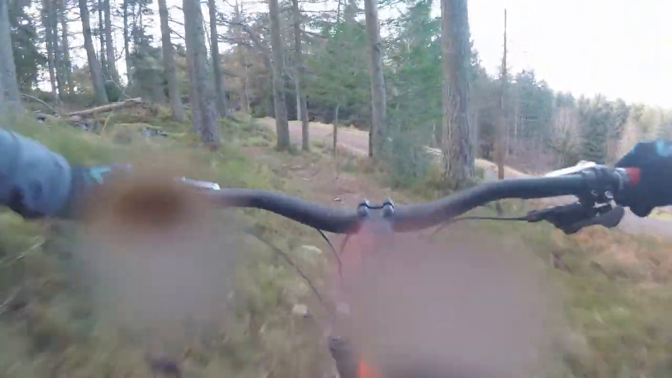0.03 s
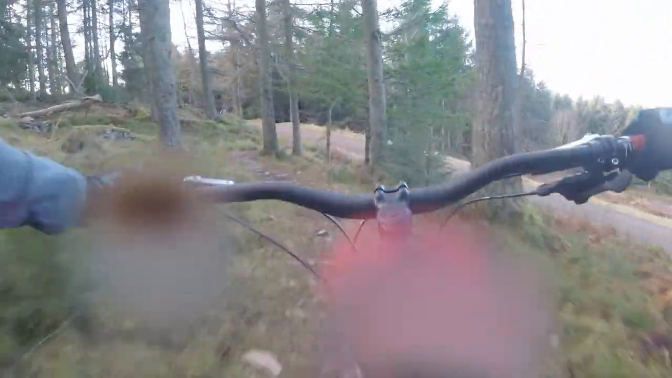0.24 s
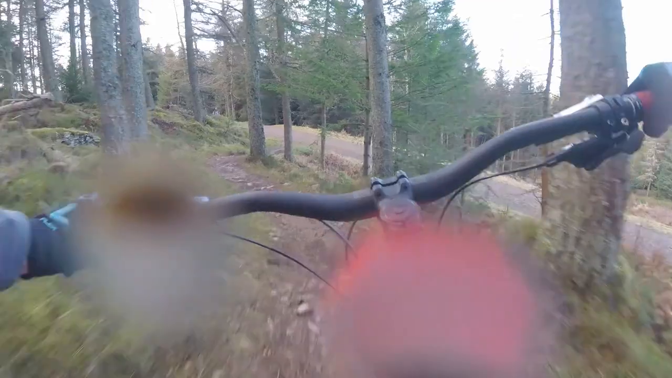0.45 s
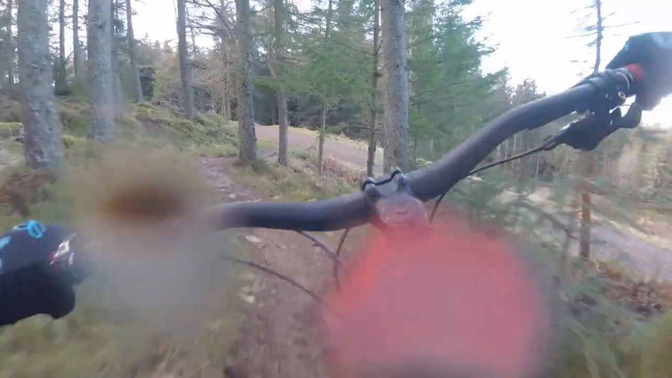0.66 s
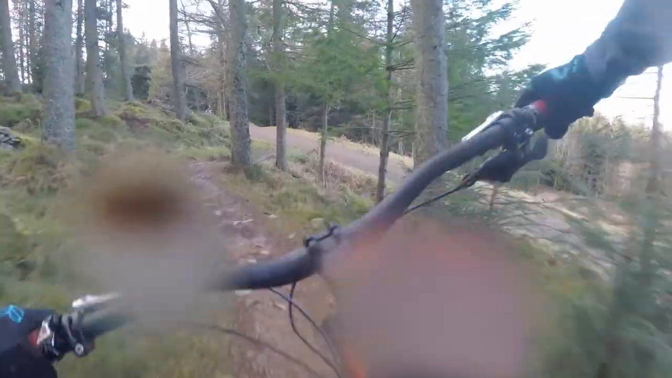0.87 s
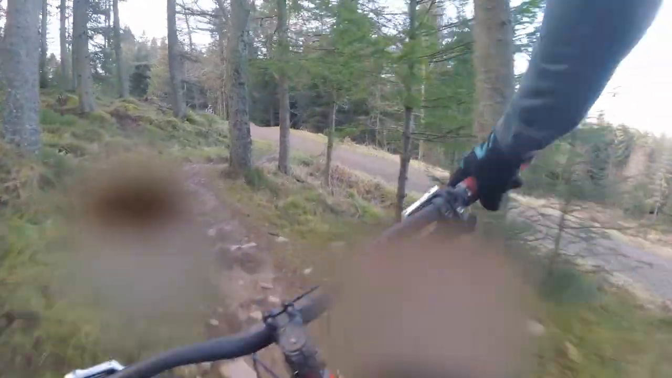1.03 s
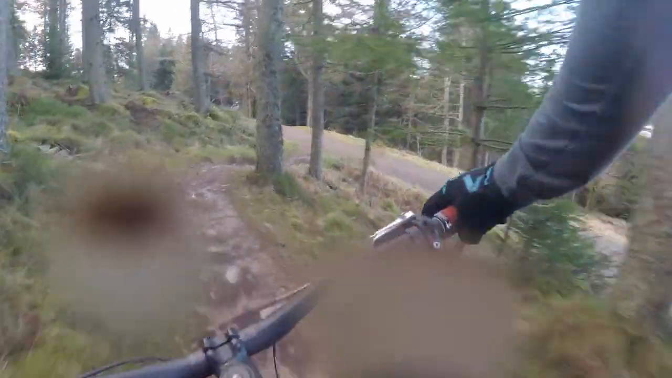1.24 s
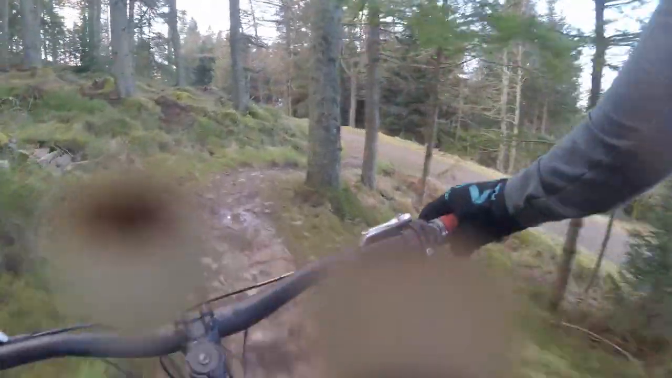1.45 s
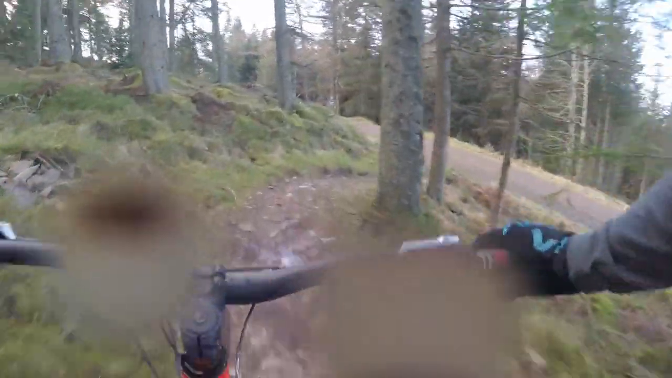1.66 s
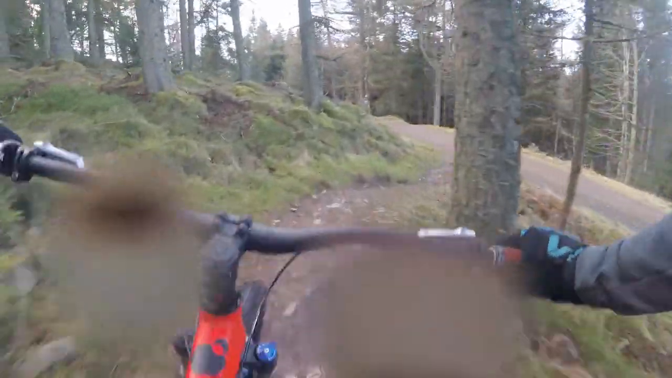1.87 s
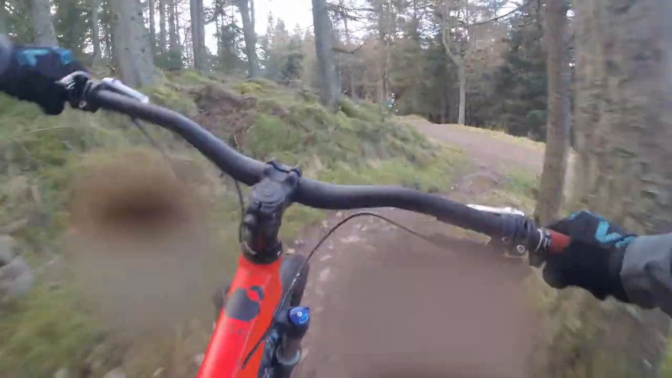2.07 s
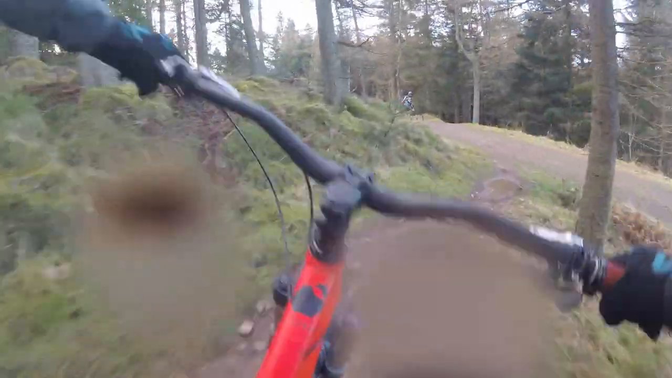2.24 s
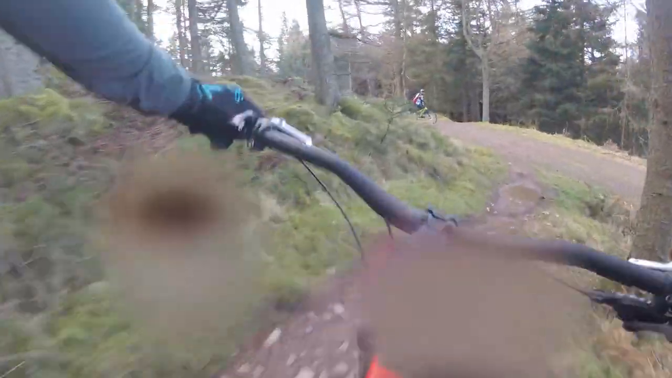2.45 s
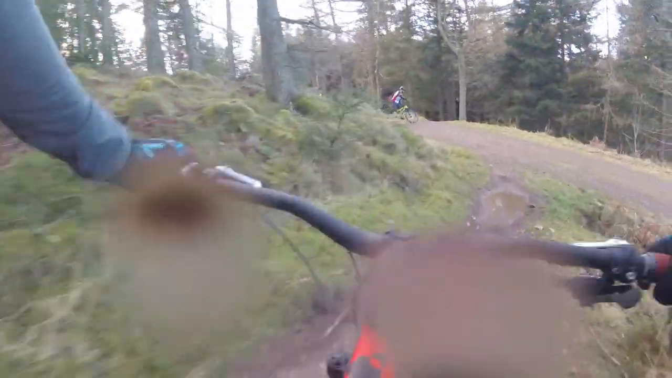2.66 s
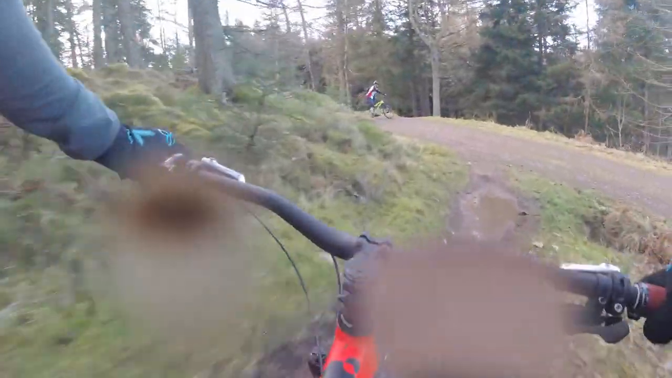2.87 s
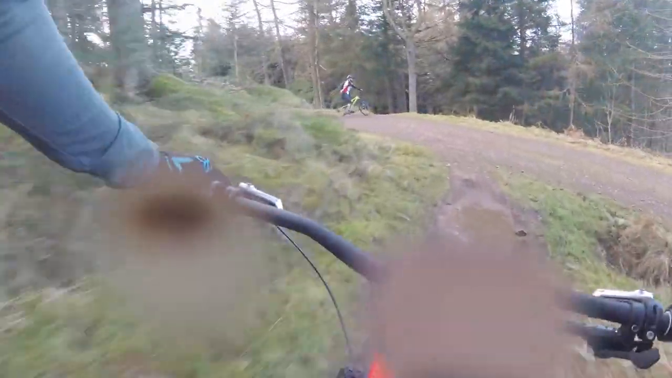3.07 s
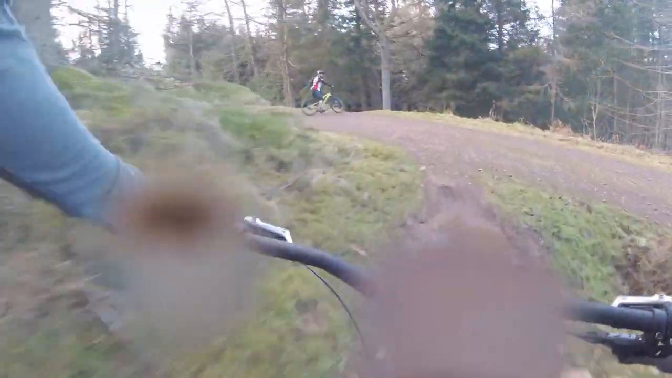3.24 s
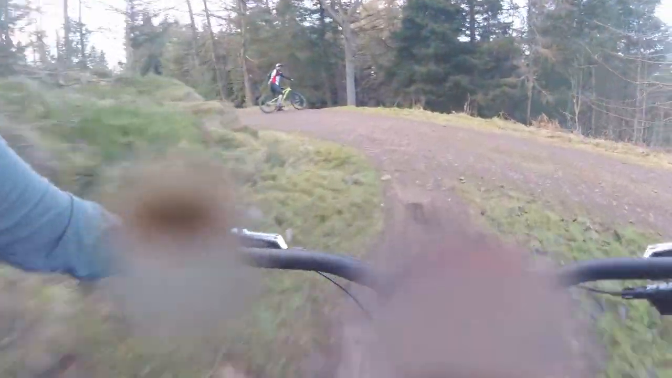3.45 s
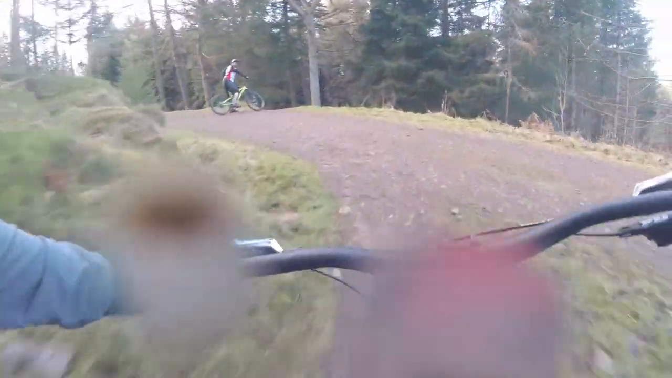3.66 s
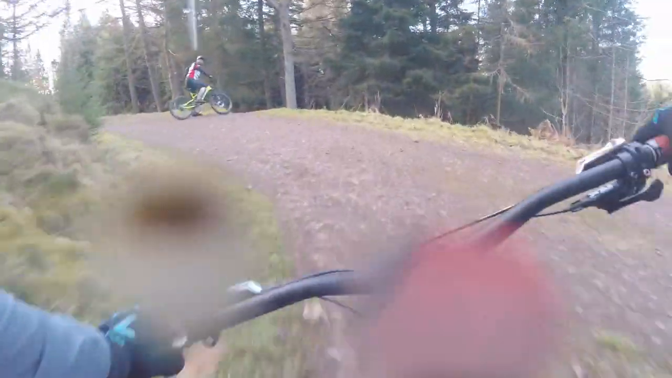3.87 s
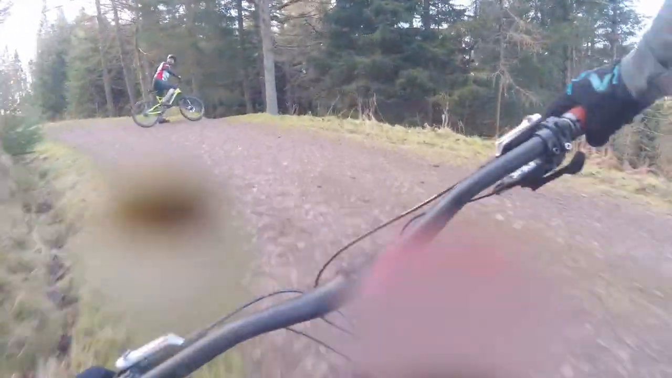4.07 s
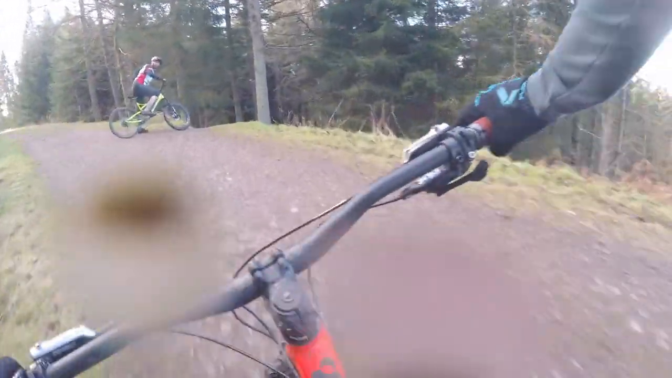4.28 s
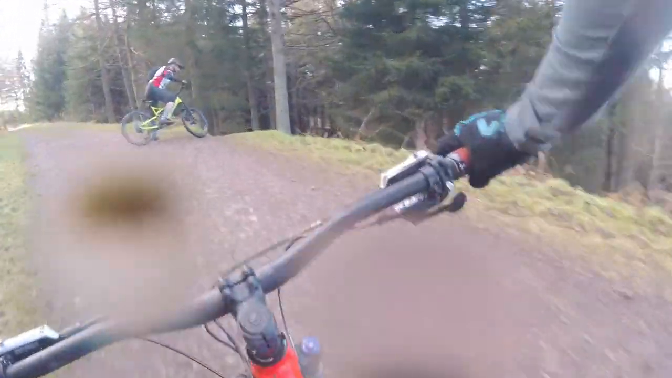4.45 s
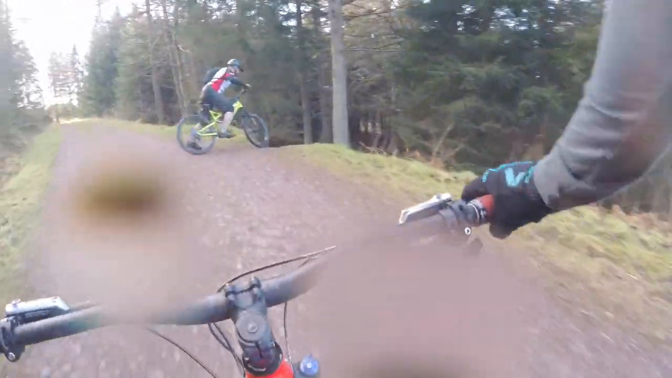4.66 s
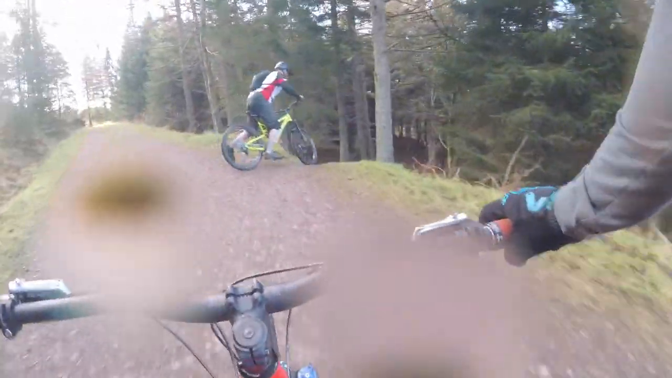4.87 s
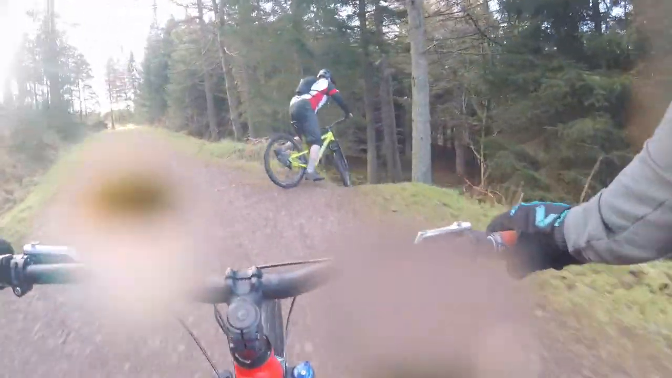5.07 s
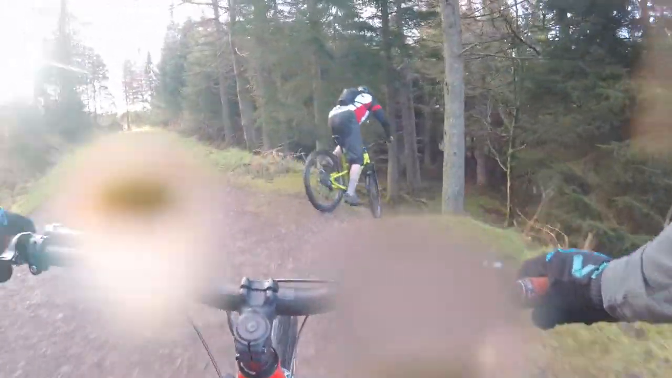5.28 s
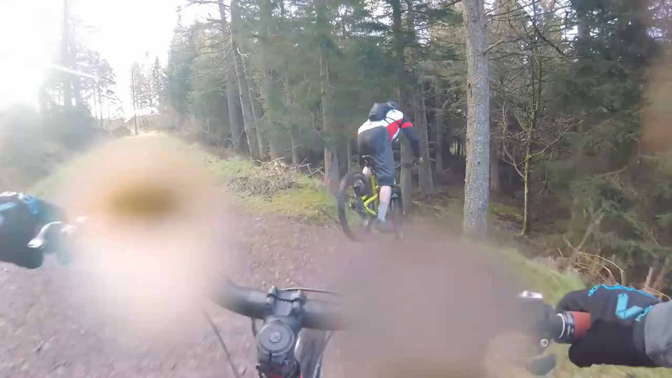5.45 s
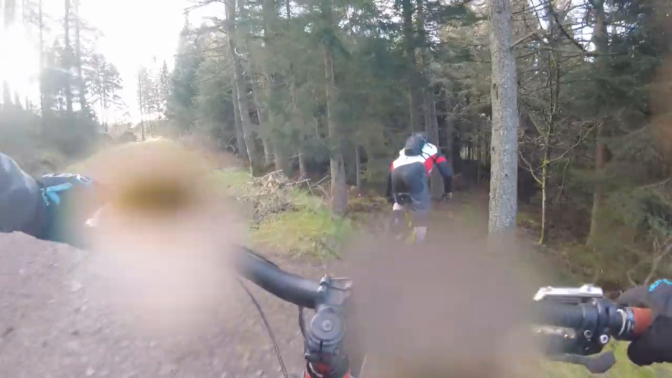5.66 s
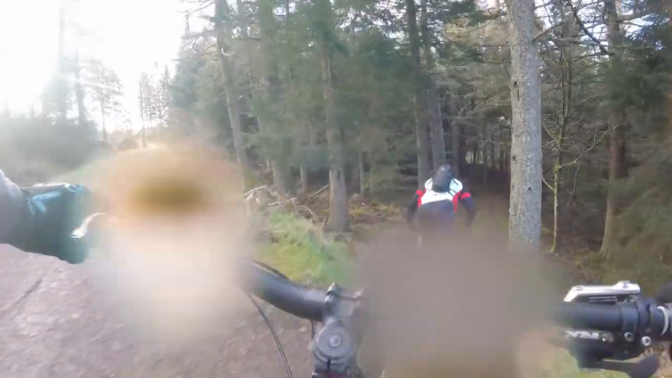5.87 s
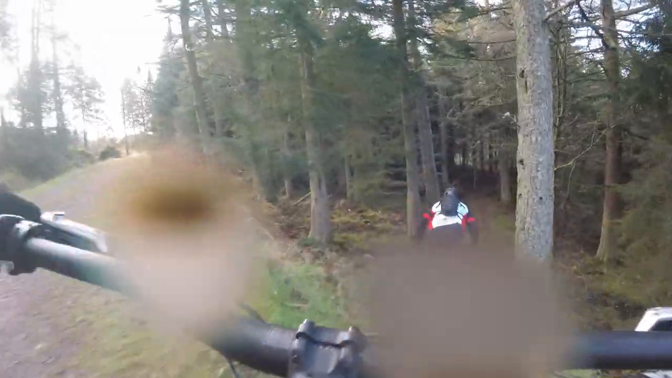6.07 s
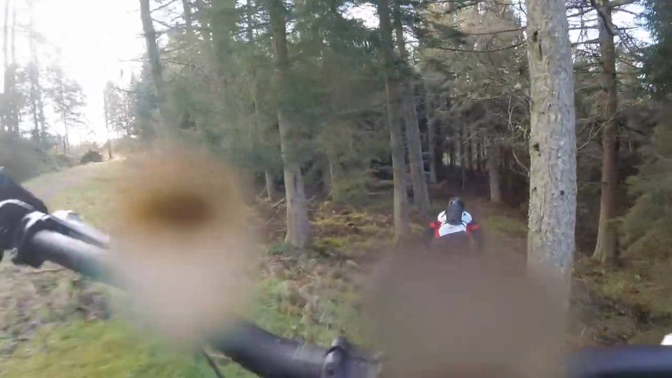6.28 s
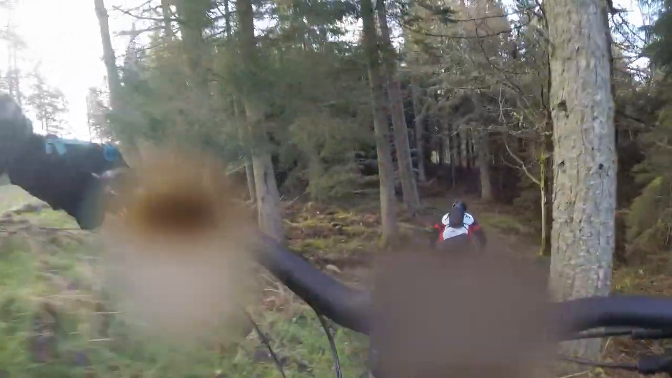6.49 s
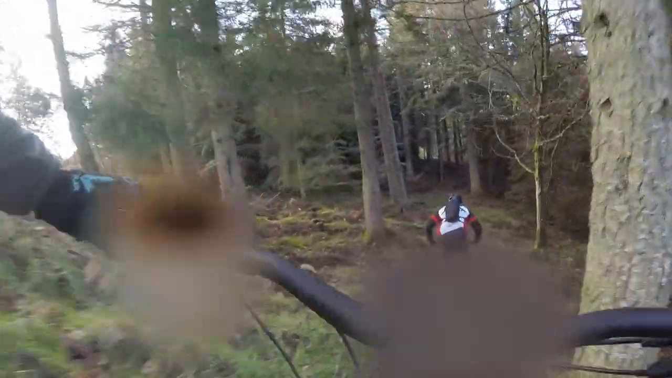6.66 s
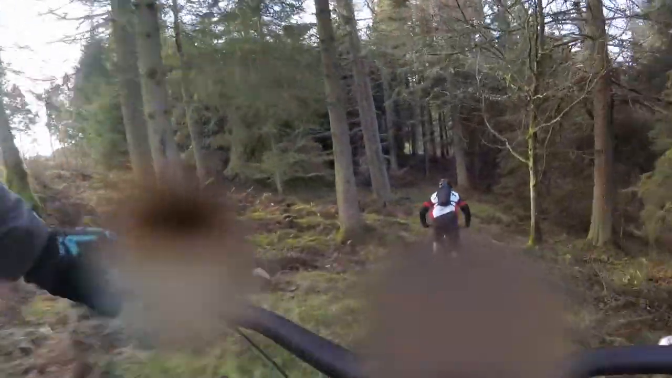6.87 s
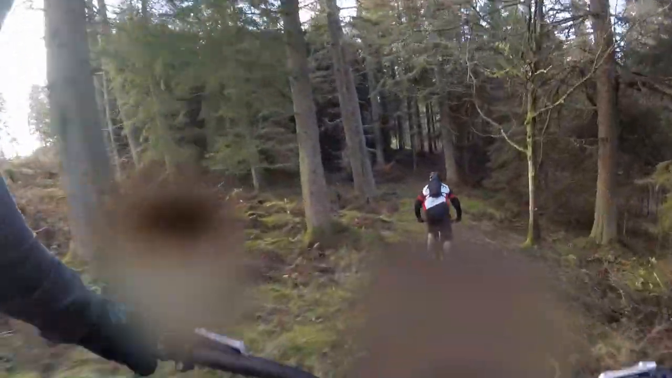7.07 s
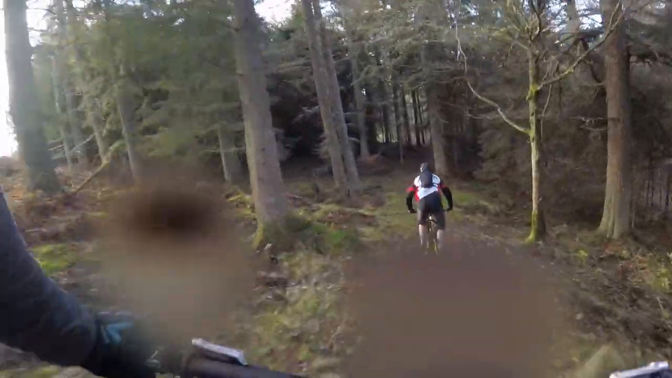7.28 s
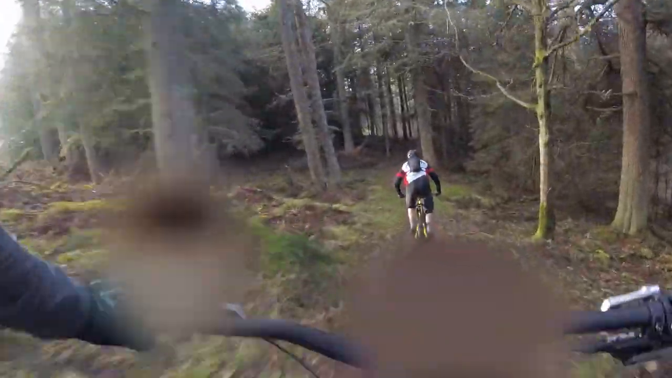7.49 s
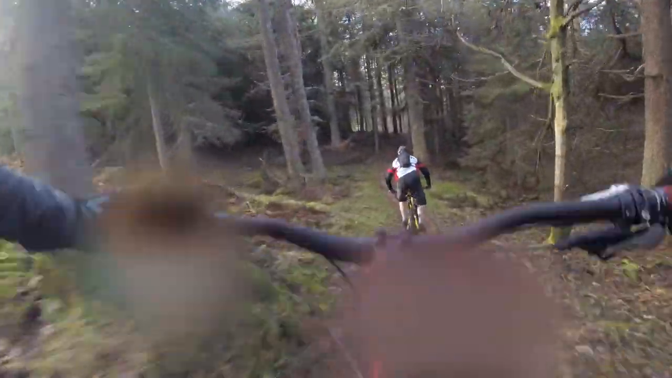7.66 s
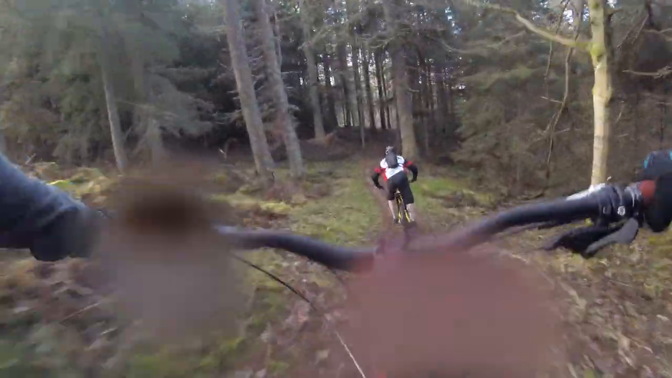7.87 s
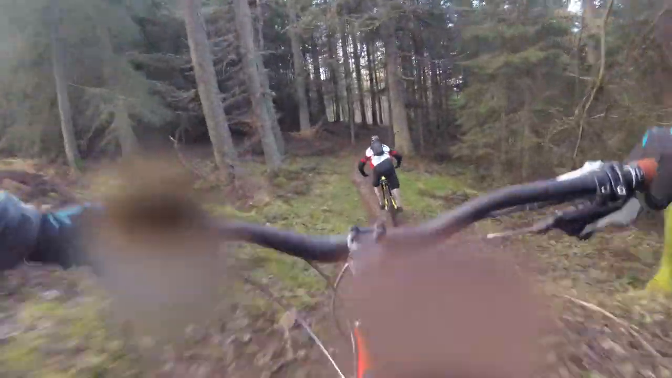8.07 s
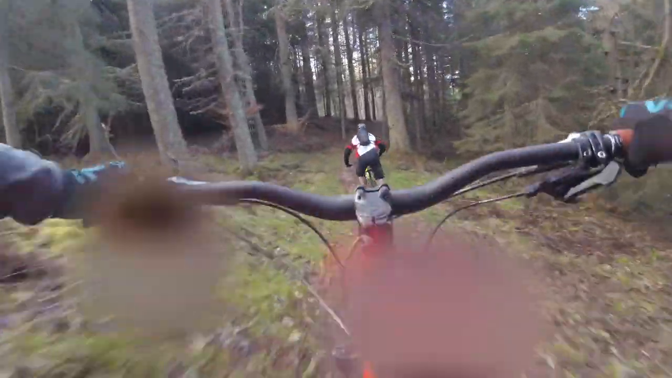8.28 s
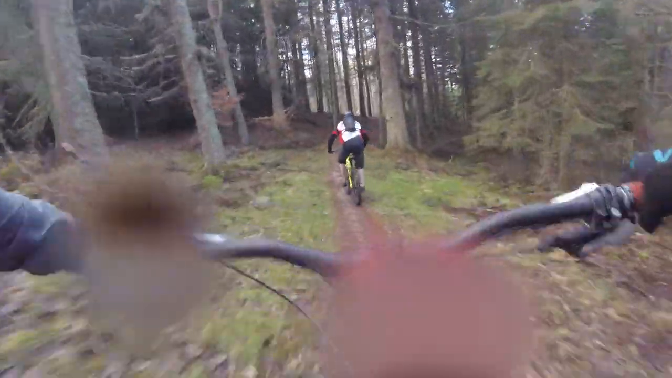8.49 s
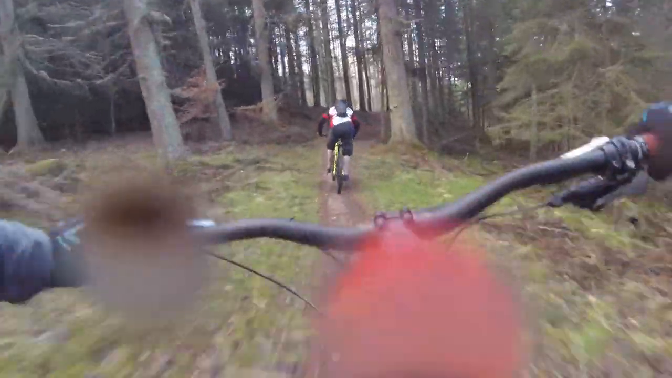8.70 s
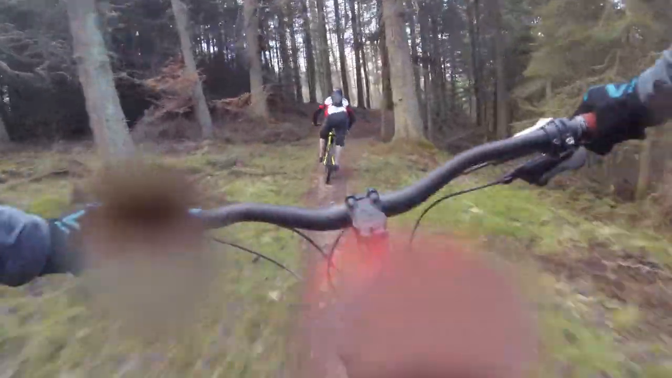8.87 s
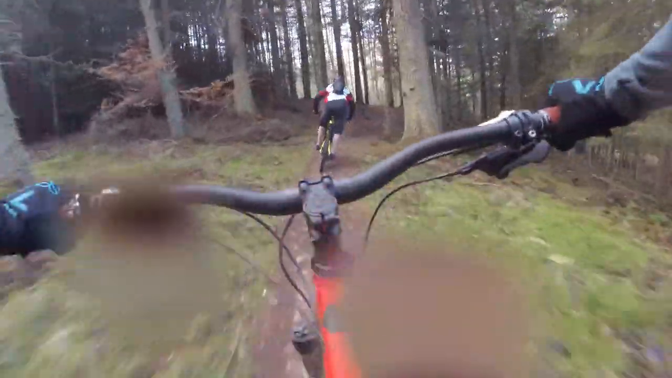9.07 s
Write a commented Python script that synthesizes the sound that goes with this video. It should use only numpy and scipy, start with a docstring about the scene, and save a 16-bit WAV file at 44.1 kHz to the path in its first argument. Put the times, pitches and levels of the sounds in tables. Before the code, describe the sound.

A mountain bike crunches down a muddy forest trail, wind rumbling on the microphone, stones clacking, a brief puddle splash, then heavy low thuds over roots.

```python
"""Wind rumbles and buffets while tyres crunch over grit, as a mountain bike rolls down a muddy trail.
It is heard from a camera on the rider's chest. The wind is noise that rises and falls in gusts.
The tyres are many tiny impacts, first on grit, then through a puddle's spray, then on needle litter.
Stones, chain and cables clack against the bike as short bursts of noise, some with a brief ring.
Roots jolt the camera mount, which thuds low while the camera case knocks."""
import sys
import numpy as np
from scipy import signal
from scipy.fft import rfft, irfft
from scipy.io import wavfile
from scipy.ndimage import uniform_filter1d

SR = 44100
rng = np.random.default_rng(int(sys.argv[2]) if len(sys.argv) > 2 else 0)


def file_out(sig):
    """Save sig as 16-bit WAV at sys.argv[1]."""
    # one column per channel
    cols = np.atleast_2d(sig).T
    # limit, then scale
    lim = np.clip(cols, -1, 1)
    pcm = np.round(lim * 32767).astype(np.int16)
    wavfile.write(sys.argv[1], SR, pcm)


N = 402621
T = np.arange(N) / SR  # time of each sample, in seconds
TOP_HZ = 15200
GRAVEL_SPREAD_DB = 3.0  # how unequal the ticks of gravel and twigs are
LITTER_FROM_S = 7.46
LITTER = np.clip((T - LITTER_FROM_S) / 0.55, 0, 1)  # share of the ground that is needle litter

# All levels in the tables are relative: each sound has its own overall level in its function.
# Tyres on the ground: (time [s], crunch [dB], hiss [dB])
ROLLING_LEVELS = [(0, -29, -41.5), (.7, -36, -46), (1.15, -27, -44.5), (1.6, -37, -43.5), (2.0, -30, -42),
                  (2.6, -37, -47), (3.3, -35, -44), (4.05, -32.5, -46.5), (4.7, -36.5, -49),
                  (5.0, -37.5, -45.5), (6.05, -42, -48), (6.7, -35, -44), (6.95, -36, -43),
                  (7.25, -33.5, -41), (7.65, -41, -46.5), (8.05, -36, -43), (8.45, -39.5, -44.5),
                  (9.13, -42, -51.5)]
# Sheets of water thrown up in the puddle: (time [s], half length [s], spray [dB], fine mist [dB])
PUDDLE_SPLASHES = [(3.404, 0.052, -32.5, -29), (3.441, 0.044, -28, -48), (3.568, 0.072, -26, -32),
                   (3.646, 0.093, -30.5, -26.5), (3.78, 0.055, -30, -36.5), (3.86, 0.17, -44.5, -55)]
# The tread flicks up wet mud: (time [s], level at the top [dB], half length [s])
MUD_FLICKS = [(1.62, -39.5, 0.03), (1.966, -36.5, 0.017), (2.266, -31, 0.011)]
# Stones and sticks kicked against the frame and rims: (time [s], peak [dB], centre of the knock [Hz])
KICKED_STONES = [(.145, -14.5, 2180), (0.346, -17, 1950), (1.028, -15.5, 1600), (1.108, -13, 1700),
                 (1.140, -20, 1500), (1.165, -22, 1400), (1.289, -20, 1300), (1.386, -11.5, 1460),
                 (1.458, -15.5, 1250), (1.75, -15, 1520), (1.8047, -11, 1900), (1.868, -19, 1300),
                 (1.885, -9, 1570), (1.991, -14, 1400), (2.040, -16.5, 1820), (2.161, -21.5, 1800),
                 (2.245, -15.5, 1440), (2.587, -15, 1320), (2.867, -21, 2500), (2.977, -21, 1340),
                 (3.732, -15.5, 1700), (3.918, -16.5, 1600), (3.9365, -14.5, 1790), (4.044, -16, 1610),
                 (4.154, -17, 1470), (4.184, -20, 1680), (4.339, -17, 1530), (4.439, -17.5, 1550),
                 (4.461, -24, 1340), (4.48, -16, 1450), (4.550, -14, 1560), (4.532, -24, 1690),
                 (4.635, -24, 1360), (4.811, -22, 1900), (4.9248, -17, 1710), (5.044, -22.5, 1230),
                 (5.179, -23, 1550), (6.255, -19, 1920), (6.2701, -13, 2050), (6.297, -25, 1600),
                 (6.658, -13.5, 1410), (6.996, -18.5, 1700), (7.178, -14.5, 1480), (7.448, -20, 1200),
                 (7.724, -19.5, 1840), (7.8329, -18, 1020), (7.881, -18, 1800), (7.952, -17, 1780),
                 (8.054, -18, 1350), (8.187, -15, 1230), (8.53, -17.5, 1250), (8.595, -17.5, 1320),
                 (8.887, -16, 1143), (8.918, -24, 1040)]
# Chain and cables slapping on metal: (time [s], peak [dB])
CHAIN_SLAPS = [(0.0208, -24.5), (.073, -23), (0.0826, -24.5), (0.9343, -25), (0.944, -20.5),
               (1.1596, -16.5), (1.886, -23), (2.244, -24.5), (4.3327, -23.5), (4.493, -29.5),
               (5.969, -30.5)]
# Bumps that jolt the camera mount: (time [s], thud peak [dB], case knock peak [dB], case pitch [Hz])
MOUNT_JOLTS = [(.175, -2, -16, 407), (.212, -12, -18, 343), (.992, -7.5, -17, 330), (1.141, -9.5, -18, 330),
               (1.806, -7, -24, 400), (1.994, -11, -14.5, 376), (2.162, -7, -22, 340),
               (2.277, -13, -15.5, 513), (2.455, -8, -18.5, 450), (3.25, -5.5, -23, 326),
               (3.73, -13.5, -17, 330), (4.044, -12.5, -23, 634), (4.332, -10.5, -22, 450),
               (6.156, -0.5, -19, 394), (6.211, -6.5, -21.5, 610), (6.274, -12, -23, 374),
               (6.352, -2, -18.5, 416), (6.369, -2.5, -14, 390), (6.404, -1, -20, 390),
               (6.426, -6, -19, 524), (6.449, -6.5, -19, 670), (6.579, -8.5, -21, 750),
               (6.677, -1, -15.5, 577), (6.693, -6, -24, 453), (6.709, -7, -23, 750), (6.759, -8, -19, 418),
               (7.233, -11, -28, 410), (7.255, -2.5, -29, 450), (7.338, -2.5, -8.5, 450),
               (7.389, -5, -14, 520), (7.398, -2, -19, 456), (7.445, -3, -23, 640), (7.833, -8, -17.5, 405),
               (8.11, -5.5, -12, 330), (8.132, 0, -10, 348), (8.161, -2, -15, 330), (8.228, -1.5, -20, 380),
               (8.273, -9, -18, 370), (8.42, -2.5, -15.5, 370), (8.438, -6, -16, 334),
               (8.463, -0.5, -13.5, 526), (8.492, -12, -15, 400), (8.585, -6, -15, 390),
               (8.621, -10, -8, 395), (8.654, -3.5, -19, 482), (8.671, -6, -20, 560),
               (8.707, -2, -9.5, 456), (8.731, -8, -16, 520), (8.84, -5.5, -15.5, 376),
               (8.891, -4.5, -13, 580), (8.919, -8.5, -15.5, 620), (8.963, -18, -11.5, 480),
               (9.009, -2.5, -19.5, 523), (9.08, -6.5, -18.5, 405)]
# Airflow over the microphone, easing on the open bend and rising down the slope:
# (time [s], rumble [dB], small eddies [dB])
AIRFLOW_LEVELS = [(0, -13.5, -19), (.2, -11, -20.5), (.3, -16.5, -26.5), (.6, -15, -28.5), (1.5, -13, -23),
                  (1.68, -20.5, -28.5), (1.78, -14.5, -25.5), (2.02, -18, -26), (2.17, -17.5, -23),
                  (2.35, -20.5, -25.5), (2.65, -16.5, -26.5), (2.95, -18.5, -26.5), (3.25, -12.5, -27),
                  (3.56, -22.5, -24), (3.72, -17, -27), (4.2, -18, -24), (4.38, -11, -26), (4.47, -23, -33),
                  (4.6, -17, -25.5), (4.8, -26, -29), (4.89, -16.5, -32), (4.98, -22, -32.5),
                  (5.45, -24, -36.5), (5.75, -15, -33), (6.0, -14.5, -32), (6.25, -11, -28),
                  (6.55, -13.5, -29), (6.8, -12, -24), (7.0, -17.5, -33.5), (7.42, -12.5, -23.5),
                  (7.55, -17, -26), (7.65, -13, -21.5), (8.3, -11.5, -20), (9.05, -14, -24),
                  (9.13, -13.5, -27)]
# Gusts that break into small eddies: (time [s], half length [s], eddies [dB])
EDDY_GUSTS = [(3.277, 0.052, -28), (6.4, 0.058, -21), (6.69, 0.027, -15), (7.237, 0.026, -17.5),
              (7.42, 0.036, -17.5), (8.132, 0.065, -21), (8.432, 0.056, -24.5), (8.67, 0.068, -25.5),
              (8.9, 0.054, -20)]

# The rest are tone colours, each listed as (frequency [Hz], strength per Hz [dB]).
# Grit crushed under the tread: (frequency [Hz], strength per Hz [dB])
GRIT_COLOUR = [(300, -7), (600, 4.5), (900, -8), (1100, 2), (1400, 1), (1900, 4.5), (2300, -8.5),
               (2900, -8.5), (3900, -17.5), (5500, -32), (8000, -23.5), (10000, -40), (15000, -72)]
# Small stones under the tread: (frequency [Hz], strength per Hz [dB])
STONE_COLOUR = [(350, -14.5), (700, -6.5), (920, 2), (1120, -9), (1400, 1), (1900, -9), (2300, -7),
                (2900, -5), (4000, -23), (8000, -20), (15000, -87.5)]
# Specks of mud off the tread: (frequency [Hz], strength per Hz [dB])
WET_COLOUR = [(1800, 1), (2800, 7.5), (4000, -9), (4950, 3), (5800, -8), (6500, 2), (8100, -2.5), (8450, 4),
              (9300, -13), (10900, -9), (11800, -19), (13000, -17), (15000, -26)]
# Dry needles under the tread: (frequency [Hz], strength per Hz [dB])
LITTER_COLOUR = [(1600, -18), (2200, 9.5), (2700, -10), (3400, 1), (4500, -19), (5500, 1), (7000, -4.5),
                 (10000, -16), (11500, -21.5), (15000, -36)]
# Water thrown off the tyres: (frequency [Hz], strength per Hz [dB])
SPRAY_COLOUR = [(300, -13), (700, -9), (916, 0), (1670, -4), (2870, -0.5), (4200, -6), (5730, -6.5),
                (6700, -7.5), (8400, -2), (9440, -20), (10900, -19), (12000, -32), (13200, -28),
                (15500, -38)]
# The finest droplets: (frequency [Hz], strength per Hz [dB])
MIST_COLOUR = [(3000, -21), (5600, -12), (6400, 5), (8400, -2), (9500, -16), (11000, -10.5), (12000, -22),
               (15000, -38)]
# Bright snap of chain and cables on metal: (frequency [Hz], strength per Hz [dB])
METAL_COLOUR = [(1500, -22), (3500, 4), (4800, 10.5), (5700, 2.5), (6600, 11.5), (8400, 8.5), (9500, -7),
                (11000, -2.5), (13000, -19), (15000, -32)]
# Low rumble of the big eddies in the wind: (frequency [Hz], strength per Hz [dB])
RUMBLE_COLOUR = [(15, -8), (25, 4.5), (40, 2), (85, 2), (125, -3.5), (180, -10.5), (260, -18), (500, -55),
                 (3000, -100)]
# Small eddies in the wind: (frequency [Hz], strength per Hz [dB])
EDDY_COLOUR = [(90, -12), (160, -3), (220, 0.5), (320, -3.5), (450, -14.5), (700, -22), (1200, -47),
               (3000, -85), (9000, -100)]
# Pops of torn air in hard gusts: (frequency [Hz], strength per Hz [dB])
FLUTTER_COLOUR = [(200, -10), (400, 4), (650, -11.5), (1000, -10.5), (1500, -20.5), (9000, -78)]


def tyres(crunch_db, grit_db=-0.33, mud_db=-8, patchy_db=1.0, stone_db=4, stone_s=0.019,
          gravel_db=3, gravel_s=0.02, gravel_hz=1400, stick_db=1.0, stick_hz=800):
    """Knobs crush grit over wet dirt; stones tick, gravel crackles and sticks in the litter crunch dully."""
    contact = grains(700, 0.89) + undb(mud_db) * rng.standard_normal(N)
    grit = colour(contact * undb(patchy_db * walk(45)), GRIT_COLOUR)
    stones = undb(stone_db) * colour(bursts(100, 4.4, stone_s), STONE_COLOUR)
    gravel = undb(gravel_db) * crackle(150, gravel_s, GRAVEL_SPREAD_DB, gravel_hz)
    sticks = undb(stick_db) * LITTER * crackle(110, stone_s, 2.6, stick_hz, octaves=.5)
    ground = even(grit + stones + gravel, 0.152)
    return (ground + sticks) * undb(crunch_db + grit_db)


def hiss(level_db, wet_db=-0.5, litter_db=1, smooth_db=2.5, flicker_db=1.34, twig_db=-4, twig_s=0.029):
    """Fine specks flung off the tread hiss, dry needles rustle more unevenly, and bits of twig tick."""
    specks = grains(1200, 4.7) + undb(smooth_db) * rng.standard_normal(N)
    specks = specks * undb(flicker_db * walk(30))
    wet = colour(specks, WET_COLOUR) * undb(wet_db)
    dry = colour(specks * undb(2 * walk(60)), LITTER_COLOUR) * undb(litter_db)
    twigs = undb(twig_db) * crackle(70, twig_s, GRAVEL_SPREAD_DB, 2820)
    return ((1 - LITTER) * wet + LITTER * dry + twigs) * undb(level_db)


def puddle(smooth_db=-8, spatter_db=1.5, flick_db=0, drop_db=-7, drop_s=0.014, mist_flicker_db=3):
    """Tyres throw up sheets of coarse drops and fine mist; wet mud gives only a thin, brighter flick."""
    drops = grains(1800, 1.06) + undb(smooth_db) * rng.standard_normal(N)
    spray = even(colour(drops * undb(spatter_db * walk(90)), SPRAY_COLOUR), 0.18)
    coarse_drops = undb(drop_db) * crackle(78, drop_s, 2.0, 2180)
    mist = colour(grains(3000, 2.2) * undb(mist_flicker_db * walk(70)), MIST_COLOUR)
    out = np.zeros(N)
    for s, half_s, spray_db, mist_db in PUDDLE_SPLASHES:
        out += (spray + coarse_drops) * swell(s, half_s, spray_db)
        out += mist * swell(s, half_s, mist_db)
    # The step between neighbouring samples is a brighter version of the spray.
    thin_spray = unit(np.diff(spray, prepend=0))
    for s, db, half_s in MUD_FLICKS:
        out += thin_spray * swell(s, half_s, db + flick_db)
    return out


def stone_hits(crunch_db, hit_db=1.0, thump_db=-6, thump_hz=330, pebble_db=6.5, pebble_hz=1450,
               scatter_octaves=0.29, count=70):
    """Big stones knock the bike and thump the wheel; random pebbles hit as hard as the tyres crunch."""
    out = np.zeros(N)
    for s, db, hz in KICKED_STONES:
        add(out, s, clack(hz), db + hit_db)
        add(out, s, knock(thump_hz, scrape_s=0.013), db + thump_db)
    for i, pitch in zip(rng.integers(0, N, count), rng.standard_normal(count)):
        pebble = clack(pebble_hz * 2 ** (scatter_octaves * pitch))
        add(out, T[i], pebble, crunch_db[i] + pebble_db)
    return out


def slaps(metal_db=2, snap_s=0.032, contact_s=0.00067, frame_hz=1350, frame_db=3):
    """Chain and cables give a bright metallic snap, and the frame knocks under it."""
    out, t = np.zeros(N), T[:2500]
    metal = colour(np.ones(1), METAL_COLOUR)[:256]  # how the metal answers a single click
    for s, db in CHAIN_SLAPS:
        contact = rng.standard_normal(len(t)) * fade(t, snap_s) * (1 - fade(t, contact_s))
        add(out, s, signal.fftconvolve(contact, metal), db + metal_db)
        add(out, s, knock(frame_hz), db + frame_db)
    return out


def jolts(thud_db=-3.0, thud_hz=155, db_per_octave=22, thud_s=0.034, case_db=2, case_s=0.014):
    """The mount thuds against the chest, deeper the harder the bump, and the camera case knocks with it."""
    out, t = np.zeros(N), T[:6000]
    for s, db, knock_db, case_hz in MOUNT_JOLTS:
        thud = ring(t, thud_hz * 2 ** (-db / db_per_octave), thud_s)
        case = ring(t, case_hz, case_s) + .5 * ring(t, case_hz * 1.775, case_s * 0.63)
        # Both swell in softly instead of starting with a click.
        add(out, s, thud * (1 - fade(t, 0.013)), db + thud_db)
        add(out, s, case * (1 - fade(t, 0.02)), knock_db + case_db)
    return out


def wind(rumble_db=0, eddy_db=-2, burst_db=3.0, flutter_db=-29, flutter_s=0.038, steepness=1.07,
         buffet_db=1.65, buffet_rate=12):
    """Big eddies rumble and buffet, small ones break off in bursts, and hard gusts tear into higher pops."""
    slow_db, fast_db = curves(AIRFLOW_LEVELS)
    fast_db = 20 * np.log10(undb(fast_db) + sum(swell(*gust) for gust in EDDY_GUSTS))
    rumble = even(colour(rng.standard_normal(N), RUMBLE_COLOUR), 0.0853)
    uneven_noise = rng.standard_normal(N) * undb(burst_db * walk(70))
    eddies = even(colour(uneven_noise, EDDY_COLOUR), 0.13)
    flutter = even(colour(bursts(110, 1.8, flutter_s), FLUTTER_COLOUR), 0.145)
    gust_db = fast_db - np.percentile(fast_db, 95)  # zero at a strong gust, negative in calmer air
    air = rumble * undb(slow_db + rumble_db)
    air += eddies * undb(fast_db + eddy_db)
    air += flutter * undb(flutter_db + steepness * gust_db)
    return air * undb(buffet_db * walk(buffet_rate))


def clack(hz, ring_share=0.57, ring_s=0.018, low_ratio=0.653, edge_db=-14, edge_hz=6800):
    """A sharp knock with a bright gritty edge; it briefly rings two modes of the part it hits."""
    hit, edge = knock(hz, scrape=.22), knock(edge_hz, octaves=0.59)
    t = T[:len(hit)]
    modes = ring(t, hz, ring_s) - .5 * ring(t, hz * low_ratio, ring_s)
    modes = modes * (1 - fade(t, ring_s / 2))
    return unit(hit) + ring_share * unit(modes) + undb(edge_db) * unit(edge)


def knock(hz, scrape=0.27, scrape_s=0.051, contact_s=0.00058, octaves=1.33):
    """A hard contact: a dry knock of noise and a short, weaker scrape, in a band around hz."""
    t = T[:2500]
    envelope = fade(t, 5 * contact_s) + scrape * fade(t, scrape_s)
    contact = rng.standard_normal(len(t)) * envelope * (1 - fade(t, contact_s))
    edges = np.clip(hz * 2 ** (np.array([-1, 1]) * octaves / 2), 100, 12000)
    return signal.sosfilt(signal.butter(3, edges, "band", fs=SR, output="sos"), contact)


def crackle(rate, t60, spread_db, centre_hz, octaves=0.99, tilt_db=-5.0, count=7):
    """Small hard bits of several sizes, each size ticking in its own band."""
    out = np.zeros(N)
    for size in np.linspace(-1, 1, count):
        edges = np.clip(centre_hz * 2 ** (size * octaves + np.array([-1, 1]) / 2), 100, 15000)
        band = signal.butter(3, edges, "band", fs=SR, output="sos")
        ticks = signal.sosfilt(band, bursts(rate / count, spread_db, t60))
        out += unit(ticks) * undb(tilt_db * size)
    return unit(out)


def bursts(rate, spread_db, t60):
    """Short random puffs of noise, each with a sudden start."""
    envelope = signal.oaconvolve(np.abs(grains(rate, spread_db)), fade(T[:2048], t60))[:N]
    return envelope * rng.standard_normal(N)


def grains(rate, spread_db):
    """Random tiny impacts of either sign, about rate of them a second, many small and a few large."""
    size = -np.log(rng.random(N) * SR / rate + 1e-9)  # above zero only where an impact falls
    sign = 1 - 2 * (np.arange(N) % 2)
    return unit((size > 0) * sign * undb(spread_db * np.clip(size, 0, 3.3)))


def ring(t, hz, t60):
    """One struck mode: a pure tone that dies away."""
    return np.sin(2 * np.pi * hz * t) * fade(t, t60)


def fade(t, t60):
    """Exponential decay that falls by 60 dB in t60 seconds."""
    return np.exp(-np.log(1000) * t / t60)


def swell(s, half_s, db):
    """A bell-shaped rise and fall of gain around time s."""
    return undb(db) * np.exp(-((T - s) / half_s) ** 2)


def walk(rate):
    """Smooth random motion of spread 1, with about rate new values a second."""
    k = max(int(SR / rate), 2)
    steps = np.repeat(rng.standard_normal(N // k + 1), k)[:N]
    return unit(uniform_filter1d(steps, k))


def colour(x, points, size=8192):
    """Filter through (Hz, dB) points without sounding ahead of the input; the result has rms 1."""
    hz, db = np.transpose(points)
    bins_hz = np.arange(size // 2 + 1) * SR / size
    gain = undb(np.interp(np.log(bins_hz + 1), np.log(hz), db))
    # Folding the cepstrum makes the filter respond at once (minimum phase).
    cepstrum = irfft(np.log(gain))
    cepstrum[1:size // 2] *= 2
    cepstrum[size // 2 + 1:] = 0
    return unit(signal.fftconvolve(x, irfft(np.exp(rfft(cepstrum))))[:N])


def even(x, span_s):
    """Hold the rms near 1 over a span and keep the faster detail."""
    return x / np.sqrt(uniform_filter1d(x ** 2, max(int(span_s * SR), 2)) + 1e-6)


def curves(rows):
    """Each level column of a table as one value a sample."""
    s, *columns = np.transpose(rows)
    return [np.interp(T, s, c) for c in columns]


def add(out, s, x, db):
    """Mix in a sound at time s with its peak at db."""
    i = max(int(s * SR), 0)
    out[i:i + len(x)] += (x * undb(db) / np.abs(x).max())[:N - i]


def unit(x):
    """Scale to rms 1."""
    return x / np.sqrt(np.mean(x ** 2) + 1e-18)


def undb(db):
    """Decibels to gain."""
    return 10 ** (np.asarray(db) / 20)


def scene():
    """Everything rides with the microphone, in open air."""
    crunch_db, hiss_db = curves(ROLLING_LEVELS)
    ground = tyres(crunch_db) + hiss(hiss_db) + puddle()
    bike = stone_hits(crunch_db) + slaps() + jolts()
    return (ground + bike + wind())[None]


def record(dry):
    """The camera rounds off the loudest peaks and cuts the top of the treble."""
    rounded = dry / (1 + (dry / .95) ** 6) ** (1 / 6)
    return signal.sosfilt(signal.ellip(8, .2, 80, TOP_HZ, fs=SR, output="sos"), rounded)


dry = scene()
out = record(dry)
file_out(out)
```